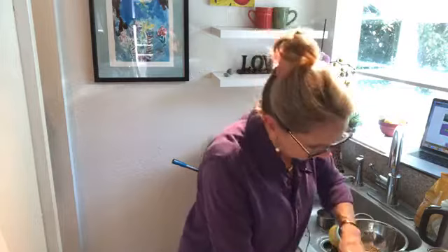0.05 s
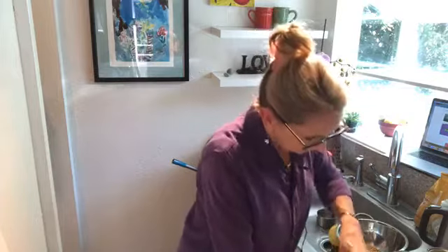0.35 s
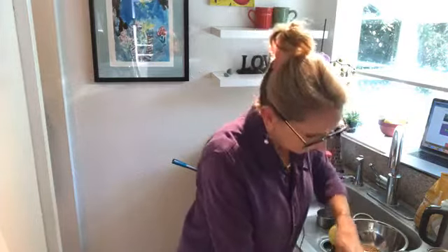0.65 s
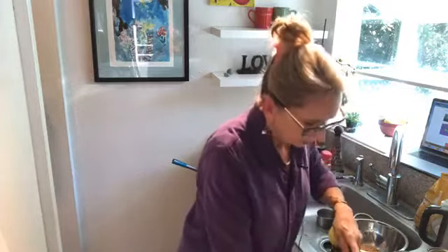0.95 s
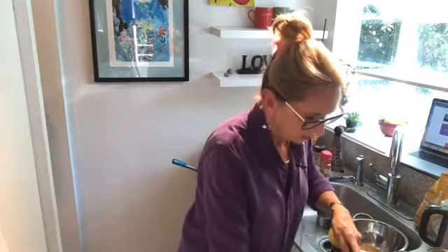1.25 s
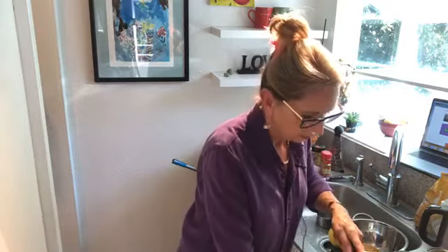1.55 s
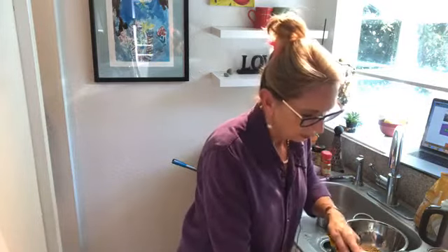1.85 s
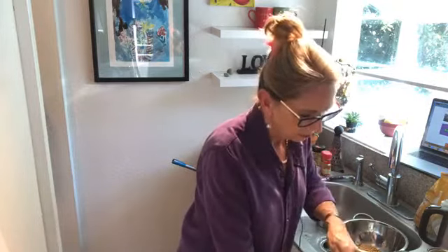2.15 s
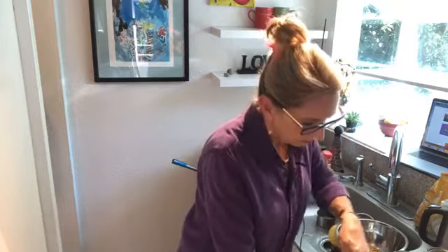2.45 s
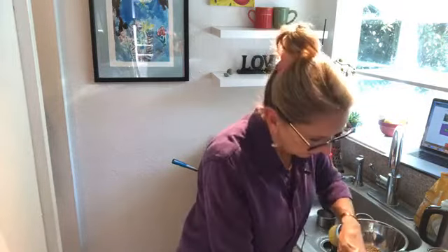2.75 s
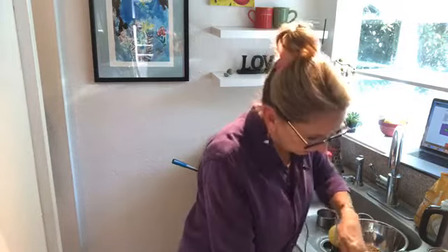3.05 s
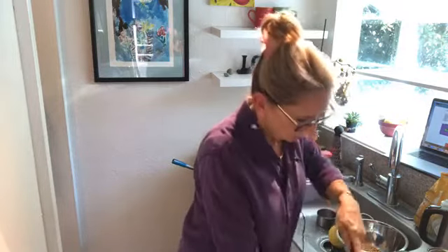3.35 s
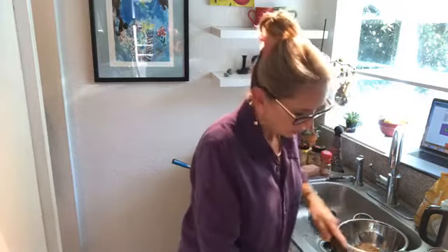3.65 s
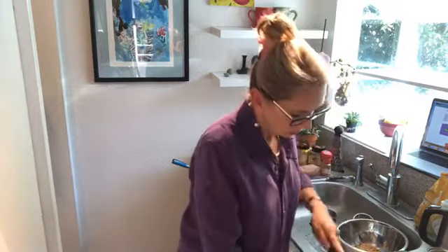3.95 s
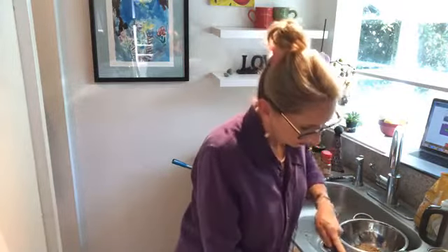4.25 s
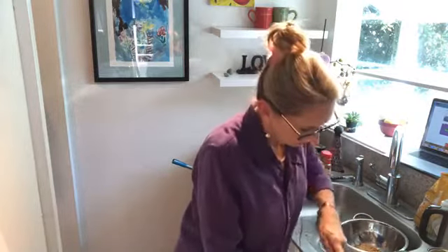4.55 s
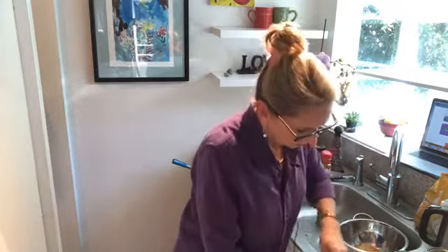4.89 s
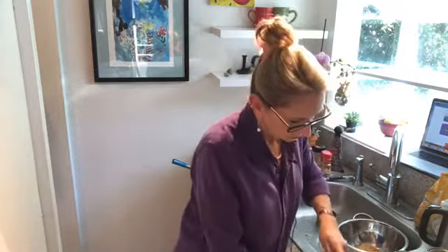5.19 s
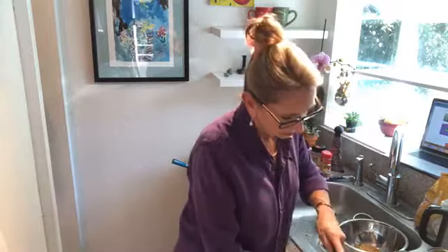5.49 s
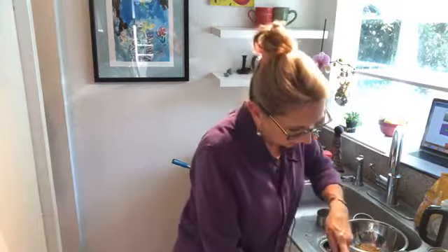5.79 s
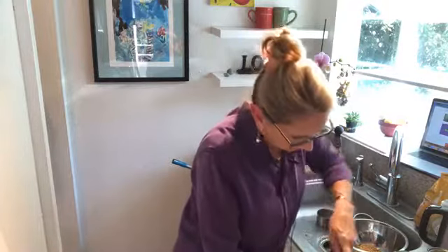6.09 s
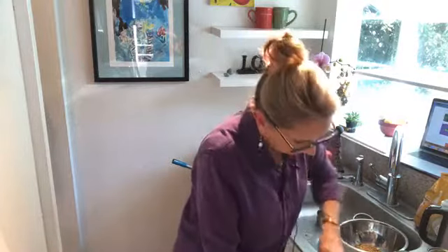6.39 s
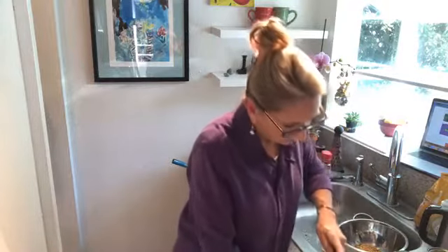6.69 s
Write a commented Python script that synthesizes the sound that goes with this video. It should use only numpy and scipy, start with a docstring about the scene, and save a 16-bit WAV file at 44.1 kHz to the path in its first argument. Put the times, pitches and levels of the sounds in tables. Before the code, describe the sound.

A kitchen knife cuts raw sweet potato on a board, close to the microphone. It opens with a rattling knock, then one very hard knock as the root splits. Short, irregular crunching cuts follow, with light ticks of the blade against the pieces, dull thuds and a few softer knocks. Underneath lie the faint hush of a small kitchen and a low rumble of air on the microphone.

```python
"""Cutting sweet potato on a board

A small kitchen, one microphone close to a board on the counter. A knife crunches through raw sweet
potato in short pushes; the root splits and the blade knocks on the board, once hard enough to overload
the microphone. Between cuts the blade ticks against the pieces and chunks thud down. Underneath lie
the hush of the room and the rumble of moving air on the microphone."""
import sys
import numpy as np
from scipy import signal
from scipy.fft import rfft, irfft
from scipy.io import wavfile

SR = 44100
rng = np.random.default_rng(int(sys.argv[2]) if len(sys.argv) > 2 else 0)


def bounce(signal):
    """Save signal as a 16-bit WAV file at the path given by the first command-line argument."""
    frames = np.transpose(np.atleast_2d(signal))
    limited = np.clip(frames, -1, 1)
    pcm = np.round(limited * 32767).astype(np.int16)
    wavfile.write(sys.argv[1], SR, pcm)


N = 305653
TIME = np.arange(N) / SR

# modes of the cabinet under the counter: f/Hz, level/dB, t60/s
CABINET_MODES = [(58, 1.5, 0.55), (112, -6.5, 0.092), (163, -11, 0.34), (239, -11, 0.24), (330, -16, 0.39)]
# spectrum of steel rubbing through the root: f/Hz, level/dB
RUB_SPECTRUM = [(80, -31.5), (320, -20), (700, -13), (1450, -12.5), (1900, -2), (2250, -4.5), (2700, -4),
                (3600, -6), (5000, -16), (9000, -26.5), (16000, -57)]
# spectrum of bursting cells: f/Hz, level/dB
CELL_SPECTRUM = [(200, -20.5), (1500, -10), (3000, 1.5), (4300, 2), (7300, 0.5), (10000, -8),
                 (13000, -22.5), (16000, -30.5)]
# spectrum of a dull slap of flesh: f/Hz, level/dB
FLESH_SPECTRUM = [(60, -12.5), (115, -7), (190, -17), (320, 0), (390, -6.5), (560, -1), (820, 1.5),
                  (1300, -6), (2000, -9.5), (6000, -43)]


def from_db(db):
    """Decibels to gain."""
    return 10 ** (np.asarray(db) / 20)


def unit(x):
    """Scale to unit energy."""
    return x / np.sqrt(np.sum(x ** 2) + 1e-20)


def burst(x):
    """Scale a short response to the energy of two milliseconds at rms 1."""
    return unit(x) * np.sqrt(.002 * SR)


def at_hz(points, hz):
    """Read a table on a log-frequency axis."""
    known, values = np.transpose(points)
    return np.interp(np.log(np.maximum(hz, 1)), np.log(known), values)


def colour(points, size=4096):
    """Minimum-phase response with a given spectrum; unit energy."""
    cepstrum = irfft(np.log(from_db(at_hz(points, np.fft.rfftfreq(size, 1 / SR)))))
    cepstrum[1:size // 2] *= 2
    cepstrum[size // 2 + 1:] = 0
    return unit(irfft(np.exp(rfft(cepstrum))))


def through(x, response):
    """Pass a sound through a response."""
    return signal.oaconvolve(x, response)[:N]


def clicks(times, levels_db):
    """One impulse for each contact."""
    return np.bincount(np.clip(np.round(times * SR).astype(int), 0, N - 1), from_db(levels_db), N)


def dying(t60):
    """One second of exponential decay."""
    return 1000 ** (-TIME[:SR] / t60)


def modes(table):
    """Struck modes from rows of f/Hz, level/dB, t60/s; neighbours swing in opposite directions."""
    return sum((-1) ** k * from_db(db) * dying(t60) * np.sin(2 * np.pi * hz * TIME[:SR])
               for k, (hz, db, t60) in enumerate(table))


def grains(per_s, spread_db):
    """Random tiny fractures, a few of them much larger than the rest; rms 1."""
    sizes = from_db(spread_db * np.minimum(rng.exponential(1, N), 4.5)) * rng.choice([-1, 1], N)
    return unit(sizes * (rng.random(N) < per_s / SR)) * np.sqrt(N)


def room_hush(level_db=-68, swell_share=0.87):
    """The room tone, a soft noise that gently swells and sinks."""
    # contour of the swell, before scaling by swell_share: t/s, level/dB
    swell = [(0.0, -61), (0.09, -69), (1.6, -69), (2.16, -77.5), (2.61, -63), (4.15, -76), (4.52, -65),
             (5.54, -75), (5.88, -68.5), (6.93, -75.5)]
    # spectrum of the room tone: f/Hz, level/dB
    spectrum = [(41, -33), (70, -5.5), (113, -2.5), (178, -17.5), (213, -5.5), (336, -4.5), (779, -16.5),
                (934, -14), (1340, -18), (2170, -20.5), (3740, -23.5), (4910, -23.5), (16000, -37.5)]
    swell_db = np.interp(TIME, *np.transpose(swell))
    gain = from_db(level_db + swell_share * (swell_db - swell_db.mean()))
    return gain * through(rng.standard_normal(N), colour(spectrum))


def draught(gain_db=6.0):
    """Slow air rumbles on the microphone."""
    # rise and fall of the rumble: t/s, relative level/dB
    gusts = [(0.0, -41), (0.09, -57), (0.19, -47), (2.01, -62.5), (2.43, -45), (2.49, -46.5), (2.99, -43.5),
             (4.17, -54), (4.34, -44), (4.48, -50), (4.82, -44.5), (5.6, -58.5), (5.67, -47), (6.41, -44.5),
             (6.77, -58.5), (6.93, -47.5)]
    # spectrum of air on the microphone: f/Hz, level/dB
    spectrum = [(10, 10.5), (20, 1), (40, -12.5), (65, -21), (110, -24), (200, -36), (500, -60.5),
                (2000, -94.5)]
    gain = from_db(np.interp(TIME, *np.transpose(gusts)) + gain_db)
    return gain * through(rng.standard_normal(N), colour(spectrum, size=16384))


def kitchen(x, near_db=-12.5, near_t60=0.076, far_db=-12.0):
    """Quick reflections off counter and wall, then the room's tail, dying band by band."""
    # the room's reverberation: f/Hz, t60/s, level/dB
    reverb = [(100, .33, 2), (500, 0.18, 3.5), (1320, 0.28, 0), (2330, .2, -7.5), (3400, 0.17, 2),
              (5000, 0.17, -1.5), (9000, .2, -4), (15000, .13, -2.5)]
    decays, levels = np.array(reverb)[:, [0, 1]], np.array(reverb)[:, [0, 2]]
    edges_hz = np.geomspace(70, 18000, 15)
    tail = 0
    for low, high in zip(edges_hz, edges_hz[1:]):
        hz = np.sqrt(low * high)
        band_pass = signal.butter(2, [low, high], "band", fs=SR, output="sos")
        band = signal.sosfilt(band_pass, rng.standard_normal(SR))
        tail = tail + band * dying(at_hz(decays, hz)) * from_db(at_hz(levels, hz))
    near = unit(rng.standard_normal(SR) * dying(near_t60) * (TIME[:SR] > .002))
    far = unit(tail * np.minimum(TIME[:SR] / .009, 1))
    return through(x, from_db(near_db) * near + from_db(far_db) * far)


def thuds(slap_t60=0.11):
    """Knife blows and softer bumps give a dull slap and wake the low modes of the cabinet."""
    # low thuds in counter and cabinet: t/s, cabinet level/dB, slap level/dB
    hits = [(.002, -36, -49.5), (0.469, -41, -31), (2.103, -47, -67.5), (2.409, -45, -55),
            (2.731, -55, -32), (3.165, -59, -53.5), (3.221, -52, -59), (3.354, -48.5, -53.5),
            (3.815, -45, -46), (4.354, -56, -43.5), (4.445, -50.5, -57), (4.612, -59, -44.5),
            (4.715, -58, -35), (5.517, -45, -66), (5.691, -48, -58.5), (5.791, -52, -57),
            (5.893, -50, -51.5), (6.238, -47, -35), (6.435, -77, -55), (6.921, -49.5, -53.5)]
    times, cabinet_db, slap_db = np.transpose(hits)
    slap = through(clicks(times, slap_db), dying(slap_t60)) * rng.standard_normal(N)
    boom = through(clicks(times, cabinet_db), modes(CABINET_MODES))
    return boom + through(slap, colour(FLESH_SPECTRUM))


def ticks(body_db=-6.0, crisp_db=-4.5, snap_gain=2.0, crumble_t60=0.022):
    """Each tick is a small snap followed by a few milliseconds of finer fractures."""
    # blade touching and snapping the pieces: t/s, relative level/dB, treble offset/dB
    touches = [(0.1537, -44, 4), (0.4421, -41, -2.5), (.819, -44, -6), (1.1111, -63, 12),
               (1.3809, -31, -13.5), (1.651, -24, -11.5), (1.6657, -30.5, -13.5), (1.728, -19.5, -11.5),
               (2.0986, -56.5, 3), (2.162, -46, -24), (2.461, -28.5, 2.5), (2.478, -28, -5),
               (2.717, -36, 2), (2.755, -34.5, -2), (2.928, -31.5, -6), (2.9552, -34, -5),
               (3.1476, -34.5, -3.5), (3.4324, -47, -14), (3.8146, -39, -5), (4.334, -32.5, -3),
               (4.4463, -40.5, 9), (4.6105, -27.5, -10), (4.7016, -32, -3), (4.7893, -30.5, -7),
               (4.834, -34, -12), (5.516, -33.5, -7), (5.6858, -34.5, -14), (5.712, -34.5, -17),
               (5.78, -34.5, -12), (5.9491, -33, -3), (5.9912, -33.5, -6.5), (6.0923, -33.5, -4.5),
               (6.122, -34.5, 3), (6.221, -32.5, -7), (6.229, -20.5, -32), (6.2649, -22.5, -29),
               (6.3102, -16, -25)]
    # spectrum of a tick's body: f/Hz, level/dB
    body_spectrum = [(100, -21), (350, -15), (750, -14), (1450, -15.5), (1950, -8), (2230, 3.5),
                     (2700, -4.5), (3200, -3), (4500, -8.5), (9000, -27), (16000, -45.5)]
    times, level_db, treble_db = np.transpose(touches)
    layers = (level_db + body_db, body_spectrum), (level_db + treble_db + crisp_db, CELL_SPECTRUM)
    out = 0
    for db, spectrum in layers:
        contact = clicks(times, db)
        crumble = grains(12000, 0.48) * through(contact, dying(crumble_t60))
        out = out + through(snap_gain * contact + crumble, colour(spectrum))
    return out


def pushes(fall_db=23.5):
    """Force builds, holds and lets go; gives the gains of rubbing and bursting, and the rasp's pitch."""
    # strokes through the flesh, rising and falling by fall_db over attack and release:
    # t/s at full force, attack/s, hold/s, release/s, force level/dB, crispness/dB, rasp f/Hz
    strokes = [(0.345, .07, 0.032, 0.035, -48, -15, 2190), (0.647, 0.038, .06, .17, -47.5, -14.5, 2130),
               (.9, .1, 0.12, .06, -70.5, -5.5, 2323), (1.43, .05, .13, 0.047, -69, -1, 2300),
               (1.73, .02, 0.011, 0.068, -51, 0, 2680), (2.323, .15, .03, 0.093, -69, 0, 2292),
               (2.403, .025, 0.081, 0.039, -48.5, 3.5, 2728), (2.615, .06, .02, 0.044, -59, -13.5, 2354),
               (2.887, .035, 0.016, .05, -54, -5.5, 2414), (2.943, .02, 0.023, 0.042, -52, 5.5, 2730),
               (3.03, 0.016, .018, 0.033, -53, -9.5, 2200), (3.135, .06, 0.043, .06, -53, -5.5, 2295),
               (3.247, .03, 0.054, 0.1, -69.5, 1, 2340), (3.355, .05, .025, .07, -63.5, -7, 2625),
               (3.747, .04, .04, .06, -71, 4, 2327), (4.052, 0.0082, 0.027, 0.06, -64, -4.5, 2351),
               (4.217, .04, 0.065, .1, -68, -0.5, 2385), (4.341, 0.043, 0.032, .035, -39, -1, 2200),
               (4.763, .04, 0.064, 0.0385, -44, -1, 2280), (5.04, .04, 0.091, 0.12, -69, 0, 2242),
               (5.684, .035, 0.049, 0.064, -52.5, -10.5, 2474), (5.799, 0.024, .02, 0.033, -40, 0, 2458),
               (5.872, .03, 0.026, 0.075, -58, -10, 2450), (6.013, 0.071, .11, .06, -62, -7, 2750),
               (6.241, .015, 0.058, 0.034, -44.5, 0, 2262), (6.304, .03, .015, 0.051, -37, -10, 2270),
               (6.435, .03, 0.0077, 0.069, -63, -1, 2659), (6.55, .08, .05, .12, -68, -8, 2110),
               (6.778, 0.098, .12, 0.11, -72, -13.5, 2100)]
    rub, crisp, weighted_hz = 0, 0, 0
    for at, attack, hold, release, force_db, crisp_db, hz in strokes:
        slack = np.maximum(at - TIME, 0) / attack + np.maximum(TIME - at - hold, 0) / release
        force = from_db(force_db - np.minimum(fall_db * slack, 100))
        rub += force
        crisp += force * from_db(crisp_db)
        weighted_hz += force * hz
    return rub, crisp, weighted_hz / rub


def rasp(pitch_hz, width_hz):
    """A narrow resonance, kept going by friction, that wanders as the blade sinks in; rms 1."""
    low_pass = signal.butter(2, width_hz / 2, fs=SR, output="sos")
    shake = signal.sosfilt(low_pass, rng.standard_normal((2, N)))
    phase = 2 * np.pi * np.cumsum(pitch_hz) / SR
    return unit(shake[0] * np.cos(phase) + shake[1] * np.sin(phase)) * np.sqrt(N)


def slicing(rub_db=-7.5, slide_db=-11.5, rasp_db=-2.0, cells_db=-1.5, fibre_db=-7.0,
            grumble_db=-54.5, cabinet_db=-54.0, breaking_db=-52.0, hard_push_db=-38):
    """Cells burst in dense grains ahead of the edge, shaking blade, board and cabinet; fibres snap."""
    # spectrum of a tough fibre snapping: f/Hz, level/dB
    fibre_spectrum = [(300, -13), (2000, -3.5), (6000, 1.5), (11500, -4.5), (16000, -14)]
    rub, crisp, pitch_hz = pushes()
    # a light push mostly slides and rasps; a hard one breaks cells
    breaking = np.clip(crisp / from_db(breaking_db), .4, .9)
    drive = np.sqrt(breaking) * grains(1100, 3.2) + np.sqrt(1 - breaking) * rng.standard_normal(N)
    friction = from_db(rub_db) * crisp * .5 + from_db(slide_db) * rub
    blade = through(friction * drive, colour(RUB_SPECTRUM))
    squeal = from_db(rasp_db) * rub * np.sqrt(1 - .5 * breaking) * rasp(pitch_hz, width_hz=470)
    cells = from_db(cells_db) * through(crisp * drive, colour(CELL_SPECTRUM))
    fibres = from_db(fibre_db) * through(crisp * grains(per_s=250, spread_db=3), colour(fibre_spectrum))
    grumble = (rub / from_db(hard_push_db)) ** 0.62   # the low end swings less than the force
    dull_body = from_db(grumble_db) * colour(FLESH_SPECTRUM, size=SR)
    cabinet = from_db(cabinet_db) * unit(modes(CABINET_MODES))
    return blade + squeal + cells + fibres + through(grumble * drive, dull_body + cabinet)


def board(times, levels_db, detune=.009, vary_db=1.37, low_cut_hz=270):
    """The small board rings without bass; spot and load shift its modes a little from blow to blow."""
    # modes of the board on the counter: f/Hz, level/dB, t60/s
    board_modes = [(232, -22, 0.45), (328.6, -13, .25), (400, -13, .06), (484, -12, 0.17), (561, -11, .15),
                   (688, -8.5, .05), (758, -6, 0.09), (852, -3, 0.078), (918, -11.5, 0.14),
                   (1150, -11, .06), (1385.6, -6, .045), (1720, -8, 0.043), (1758, -3.5, .07)]
    hz, db, t60 = np.transpose(board_modes)
    out = np.zeros(N + SR)
    for at, gain in zip(times, from_db(levels_db)):
        pitch_draw, level_draw = rng.standard_normal((2, len(hz)))
        ring = modes(zip(hz * (1 + detune * pitch_draw), db + vary_db * level_draw, t60))
        start = round(at * SR)
        out[start:start + SR] += gain * burst(ring)
    return signal.sosfilt(signal.butter(2, low_cut_hz, "high", fs=SR, output="sos"), out[:N])


def chatter(times, levels_db, loss_db, count=6, first_gap_s=.0018, gap_growth=1.5):
    """The blade rebounds on the board in a quick run of ever weaker contacts."""
    turn = np.arange(count)
    delay = np.r_[0, np.cumsum(first_gap_s * gap_growth ** turn[:-1])]
    contact_db = levels_db[:, None] - loss_db[:, None] * turn
    return clicks((times[:, None] + delay).ravel(), contact_db.ravel())


def knocks(rattle_t60=0.1, tear_s=0.0052, ring_db=-9.5, steel_db=-9.5, steel_t60=.18):
    """The flesh tears in a swift swell; the blade lands, chatters, rattles and rings steel and board."""
    # knife on board: t/s, levels/dB of blade, board, rattle and tear, loss per rebound/dB
    blows = [(.001, -20.5, -34, -20, -78, 6), (0.014, -19.5, -36, -29, -68, 13.5),
             (0.054, -39, -62, -36.5, -70, 18), (.2921, -36, -38.5, -51, -72.5, 23.5),
             (0.4665, -22, -59, -60, -21, 20), (0.4682, 1.5, -15, -15.5, -32, 3),
             (2.7318, -19.5, -24.5, -34.5, -33, 4.5), (3.7894, -50, -46.5, -68, -66.5, 9),
             (4.7146, -14.5, -21, -32.5, -35, 6.5), (6.2347, -33, -31.5, -34.5, -40, 7)]
    # spectrum of the blade's impact: f/Hz, level/dB
    impact_spectrum = [(100, -25), (400, -18), (1250, -20.5), (1900, -3.5), (2300, 3.5), (2800, -1.5),
                       (3800, -11), (7000, -30.5), (10000, -45.5), (16000, -70)]
    # damped resonances of blade and handle: f/Hz, width/Hz, level/dB
    blade_modes = [(1734, 140, -6.5), (2120, 580, 0.5), (2560, 1500, -11.5), (3120, 650, -7.5)]
    # partials of the steel singing on after a blow: f/Hz, level/dB
    steel_partials = [(2087, -2), (2139, -4), (2226, -2.5), (2287, 1), (2450, -4.5), (2520, 2.5),
                      (2574, -4), (2669, -4.5), (2739, -5), (2935, -7), (3084, -5.5), (3197, -4)]
    # spectrum of the blade's rattle: f/Hz, level/dB
    rattle_spectrum = [(100, -21), (230, -8), (400, -12.5), (1050, -1.5), (1400, -3), (2100, -3.5),
                       (2900, -0.5), (4000, -11), (6000, -17.5), (10000, -37.5), (16000, -66)]
    times, blade_db, board_db, rattle_db, tear_db, loss_db = np.transpose(blows)
    blade_ring = modes([(hz, db, np.log(1000) / (np.pi * width)) for hz, width, db in blade_modes])
    impact = burst(colour(impact_spectrum, size=SR)) + from_db(ring_db) * burst(blade_ring)
    blade = through(chatter(times, blade_db, loss_db), impact)
    steel_ring = modes([(hz, db, steel_t60) for hz, db in steel_partials])
    steel = through(clicks(times, blade_db + steel_db), burst(steel_ring))
    rattle_gain = through(clicks(times, rattle_db), dying(rattle_t60))
    rattle = through(rattle_gain * grains(5000, 1.3), colour(rattle_spectrum))
    # a decay run backwards, so the tearing grows into each blow
    build_up = through(clicks(times, tear_db)[::-1], np.exp(-TIME[:SR] / tear_s))[::-1]
    tear = through(build_up * grains(9000, 2.3), colour(CELL_SPECTRUM) + 0.13 * colour(RUB_SPECTRUM))
    return blade + steel + board(times, board_db) + rattle + tear


def scene(knock_room_db=-2.0, tick_room_db=1.5):
    """The knife up close in mono, with the kitchen answering; thuds, draught and hush lie below."""
    knock, tick, cut = knocks(), ticks(), slicing()
    room = kitchen(from_db(knock_room_db) * knock + from_db(tick_room_db) * tick + cut)
    return (knock + tick + cut + room + thuds() + draught() + room_hush())[None]


def record(dry):
    """The loudest blow softly overloads the microphone; the top is cut steeply."""
    ceiling, cutoff_hz = .8, 16000
    rounded = dry / (1 + (dry / ceiling) ** 4) ** .25
    return signal.sosfilt(signal.ellip(10, .1, 70, cutoff_hz, fs=SR, output="sos"), rounded)


dry = scene()
out = record(dry)
bounce(out)
```